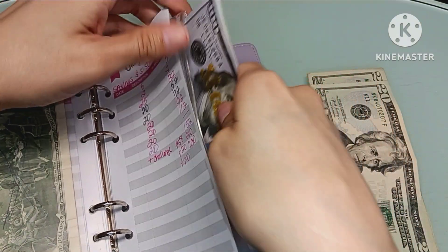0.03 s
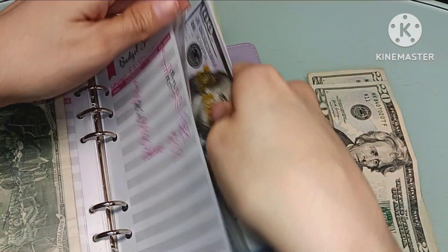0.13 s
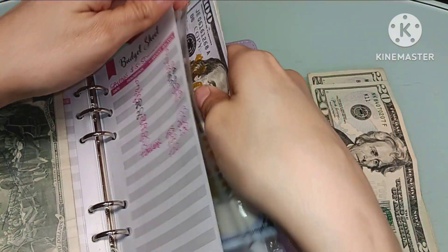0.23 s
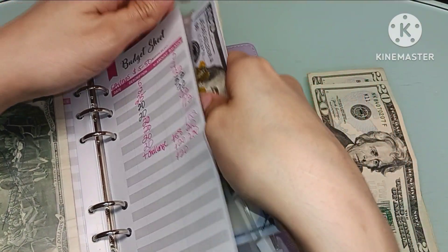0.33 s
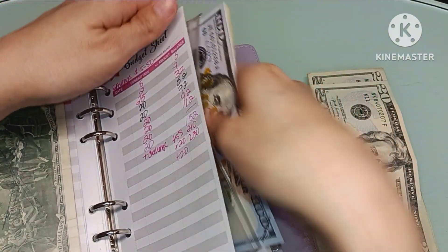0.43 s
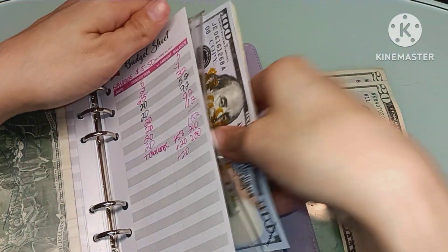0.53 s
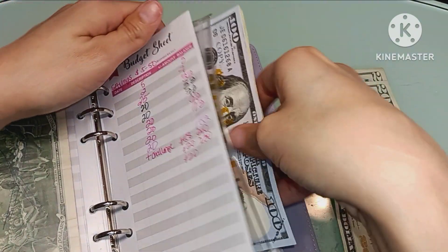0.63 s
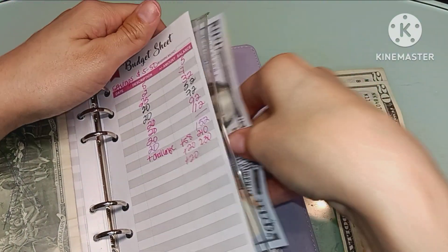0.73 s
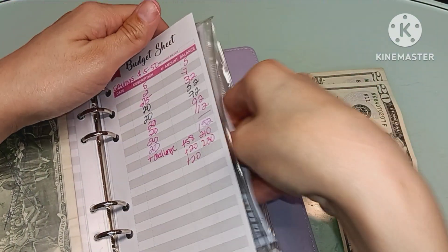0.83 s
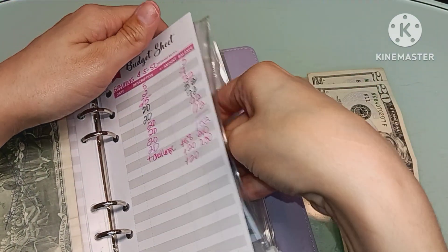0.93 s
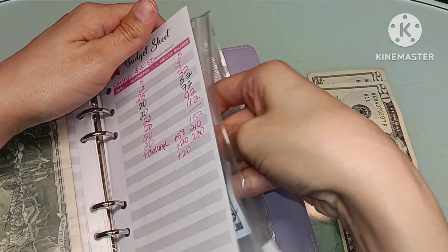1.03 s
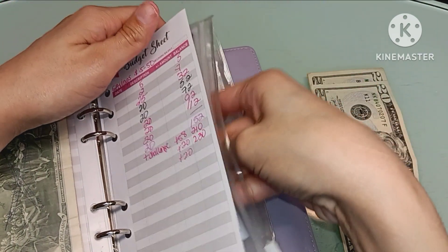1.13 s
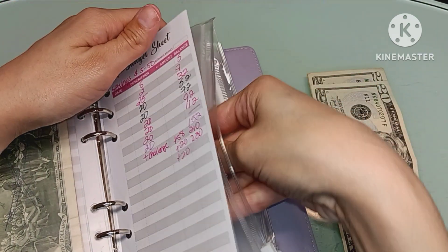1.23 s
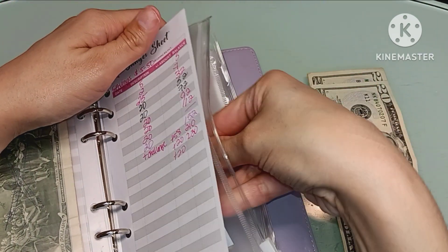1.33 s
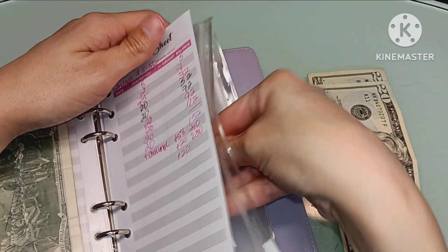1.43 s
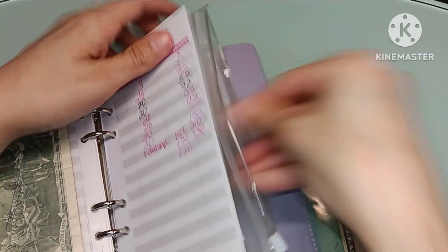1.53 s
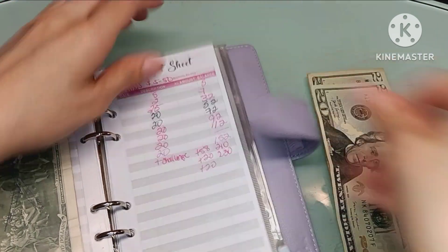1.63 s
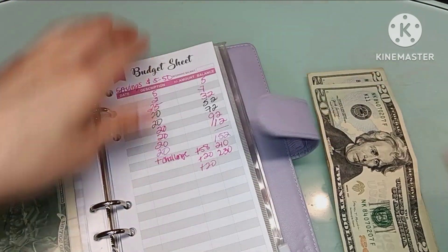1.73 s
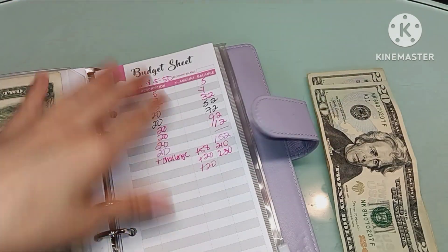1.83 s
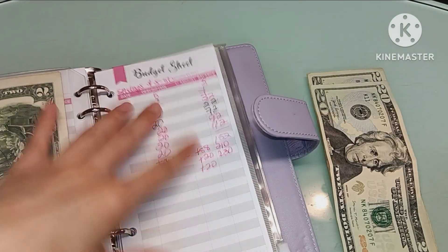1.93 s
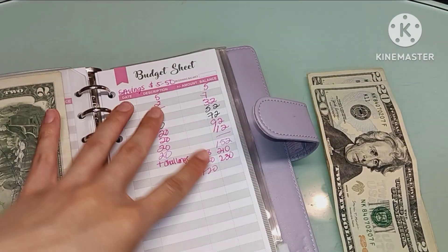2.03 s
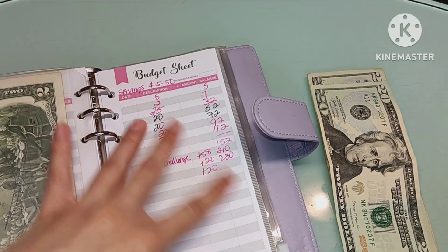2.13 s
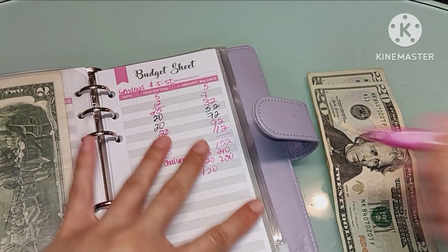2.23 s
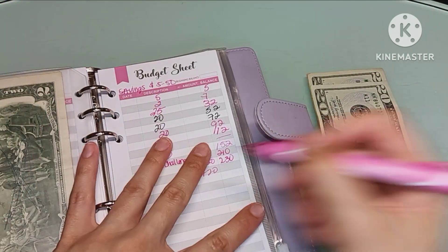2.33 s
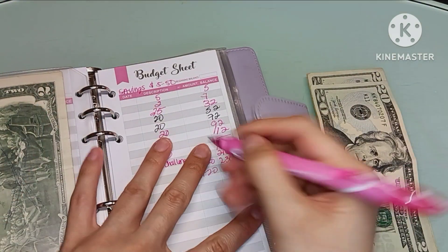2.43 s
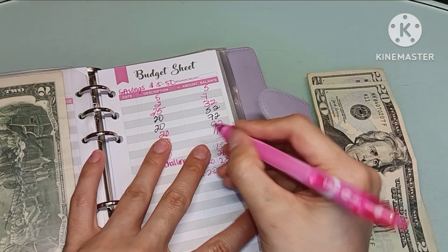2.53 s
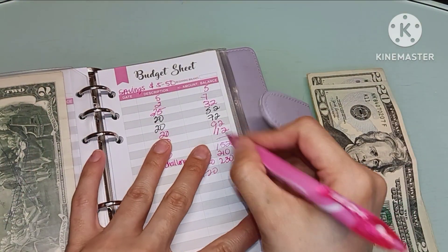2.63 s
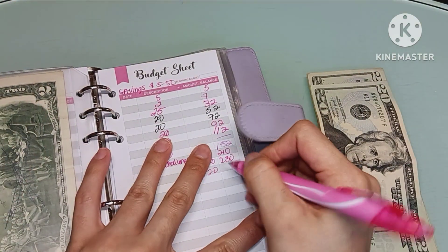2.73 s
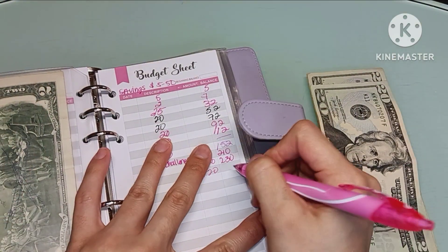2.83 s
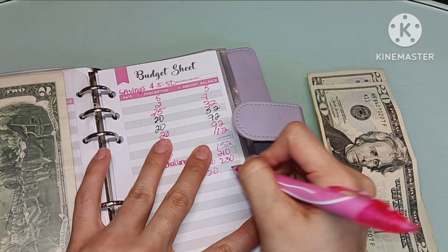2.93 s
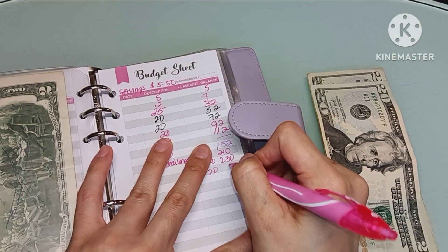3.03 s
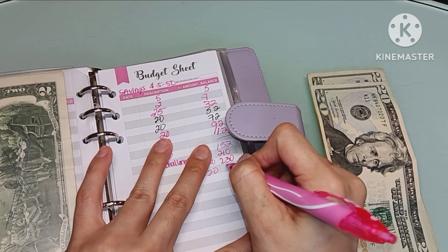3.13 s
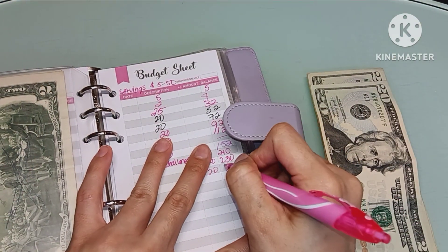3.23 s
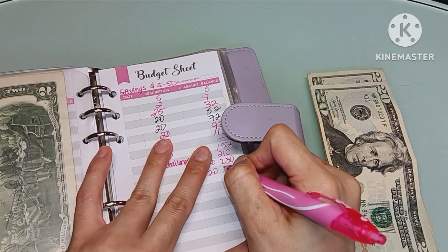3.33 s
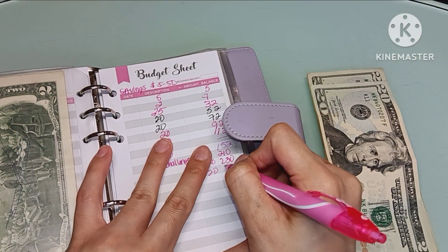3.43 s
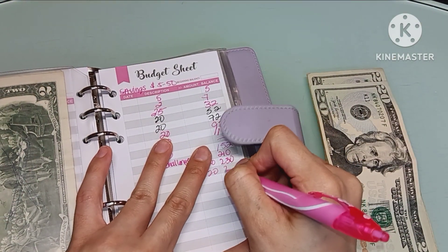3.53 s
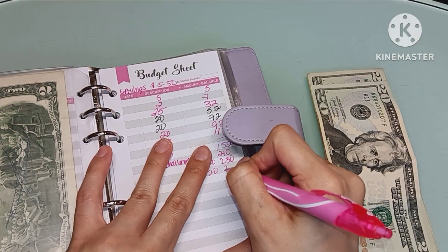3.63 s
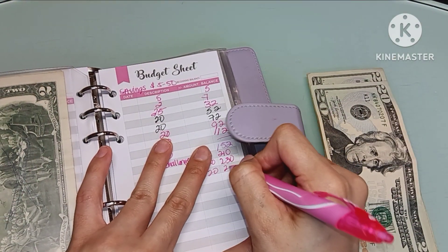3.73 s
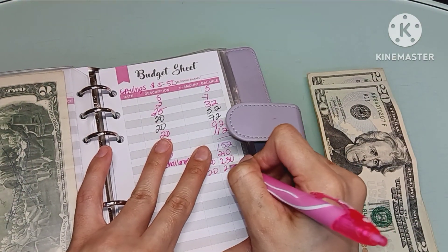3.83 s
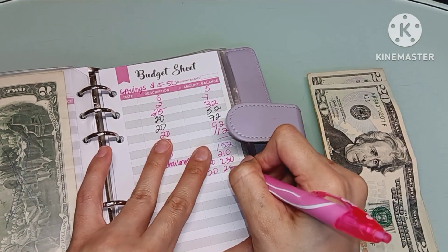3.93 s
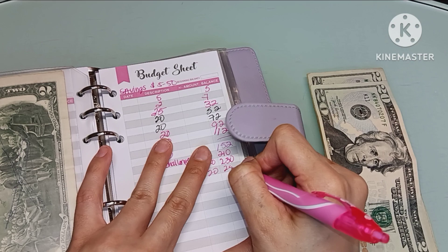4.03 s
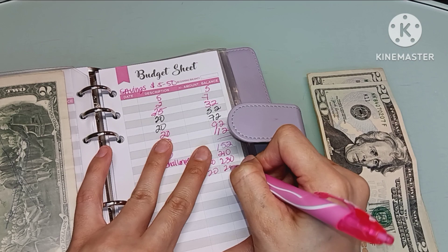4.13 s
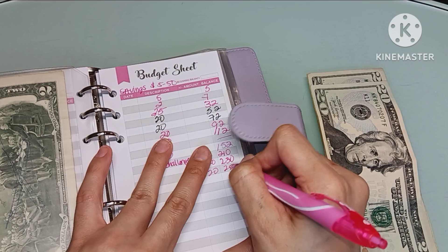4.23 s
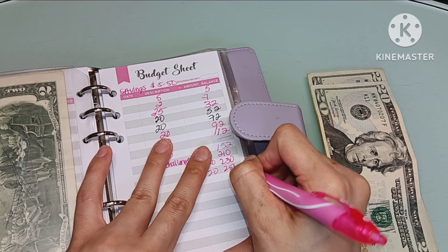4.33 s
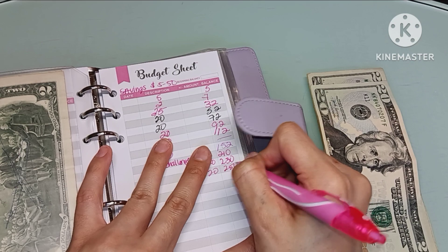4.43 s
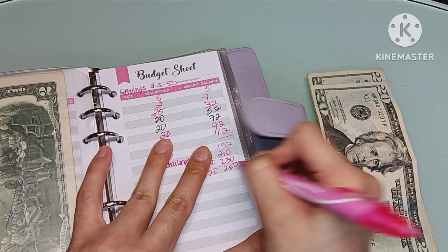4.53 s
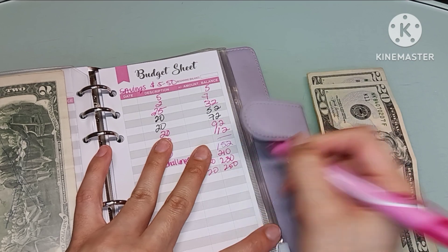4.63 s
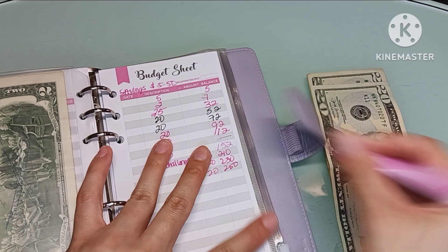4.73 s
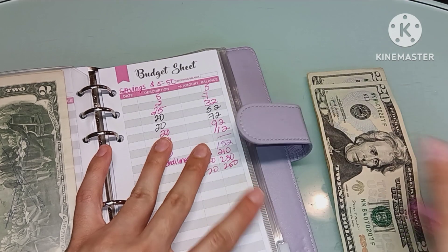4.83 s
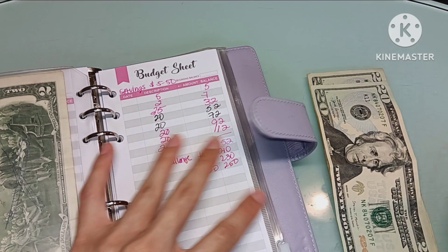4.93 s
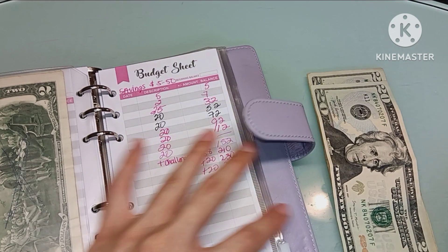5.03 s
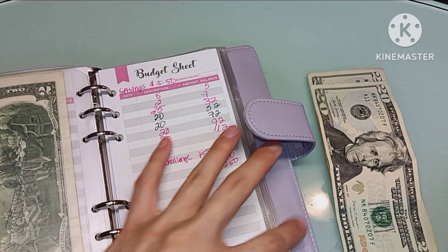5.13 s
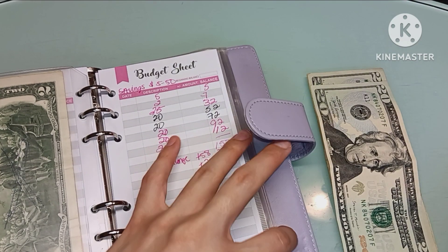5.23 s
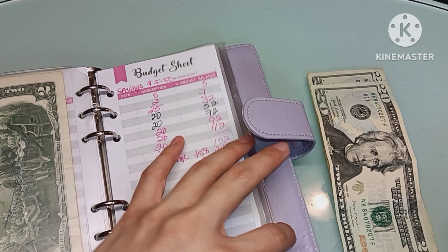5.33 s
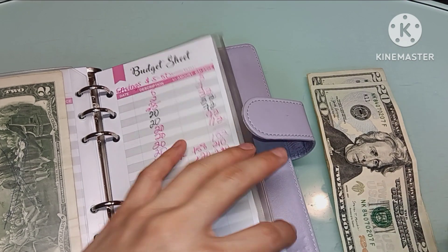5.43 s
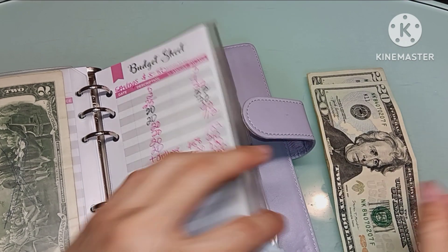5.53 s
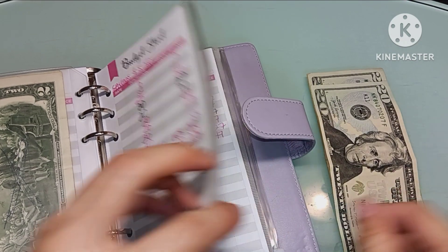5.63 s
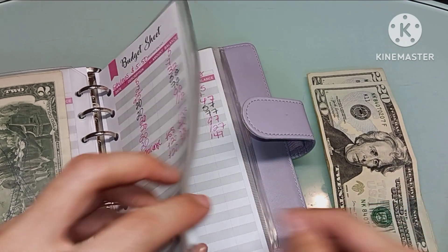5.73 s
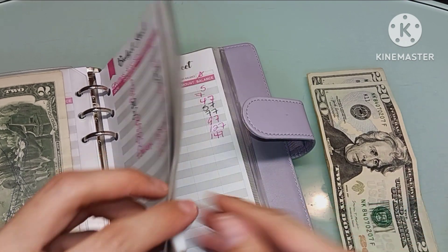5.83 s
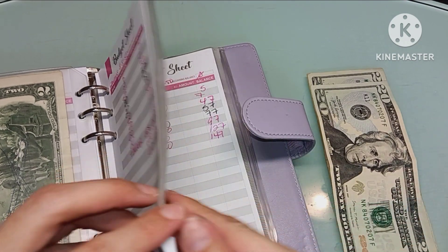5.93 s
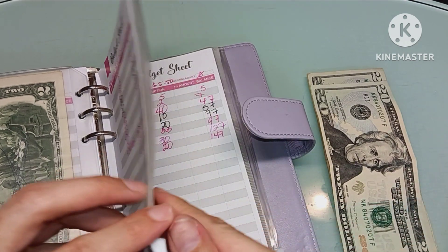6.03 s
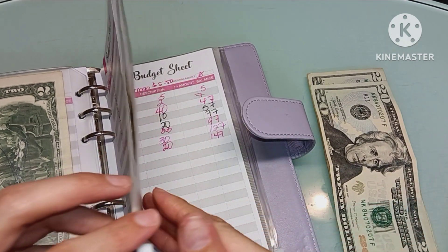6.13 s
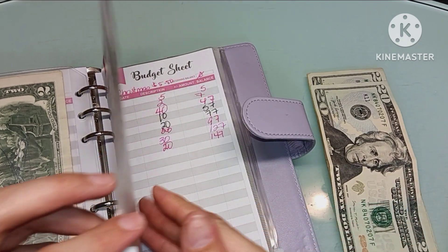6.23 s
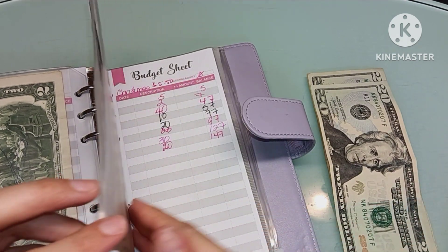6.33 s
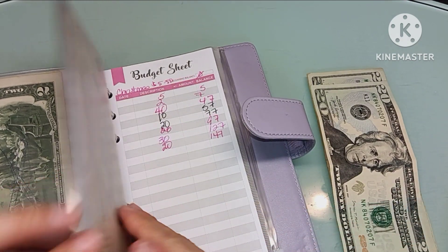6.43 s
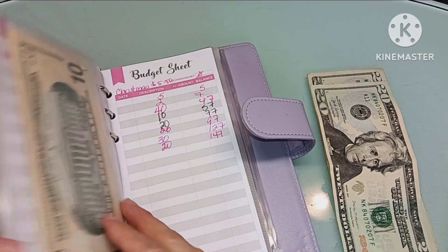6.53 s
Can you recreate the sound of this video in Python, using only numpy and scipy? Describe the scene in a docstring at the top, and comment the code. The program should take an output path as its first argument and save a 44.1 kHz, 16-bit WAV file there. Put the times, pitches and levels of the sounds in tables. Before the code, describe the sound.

Crisp paper money crinkles, followed by soft pen scratches, a click, a pen clattering onto a table and a rustling page turn.

```python
"""Banknotes rustle into a plastic pocket of a ring binder on a glass table; the page falls, a pen writes,
is clicked and dropped, and the next page is turned. Stick-slip friction drives the sheets; sudden
releases and impacts set creases, rings, pen and table vibrating in damped modes. A quiet room rumbles,
and two thin electrical whines stand in the treble. All is heard at the two ports of a nearby phone,
the right one bright, the left one dull and later."""
import sys
import numpy as np
from scipy import signal
from scipy.fft import rfft, irfft, next_fast_len
from scipy.io import wavfile
from scipy.ndimage import uniform_filter1d, map_coordinates

SR = 44100
rng = np.random.default_rng(int(sys.argv[2]) if len(sys.argv) > 2 else 0)


def to_wav(s):
    """Save 16-bit WAV."""
    ch = np.atleast_2d(s).T  # columns
    pcm = np.round(np.clip(ch, -1, 1) * 32767)  # PCM
    wavfile.write(sys.argv[1], SR, pcm.astype(np.int16))


N = 290795

# Strokes of sheet, hand or pen. Each row: start and length in seconds, base growth in dB, base decay in
# dB per second, levels of hiss, scrape, bending and flap in dB, left-right bias in dB.
STROKES = [(0, 0.027, -1.5, 300, -54, -54, -45.5, -62.5, 3),
           (0.041, 0.089, -1, 213, -48, -46, -42.5, -57.5, 2.5),
           (0.288, 0.062, 1.5, 250, -53.5, -51.5, -49.5, -73, -0.5),
           (0.366, 0.15, -8, 282, -48.5, -49.5, -51, -64, -11.5),
           (0.615, .18, 9, 450, -51.5, -52.5, -49.5, -71, -10.5),
           (0.871, 0.096, 5, 304, -59.5, -65, -55.5, -66.5, -7.5),
           (1.043, .03, 6.5, 200, -63, -60, -58, -90, -10),
           (1.1, 0.063, -0.5, 352, -48, -47.5, -48.5, -61.5, -7),
           (1.193, 0.071, -4, 600, -56.5, -62.5, -57.5, -64.5, -6),
           (1.374, 0.0063, -2, 250, -55, -67, -61.5, -82, 4),
           (1.438, 0.041, 1.5, 492, -50, -44.5, -43, -47.5, -3),
           (1.583, 0.011, -9, 702.5, -57, -52.5, -59, -54.5, 2),
           (1.809, 0.058, -1, 300, -90, -92, -74.5, -63, 1),
           (1.888, 0.0087, 1.5, 450, -57, -64.5, -66, -79.5, 0),
           (1.95, 0.11, 3.5, 300, -61.5, -75, -81, -84, -6),
           (2.054, 0.024, -0.5, 800, -53.5, -66, -74, -70.5, -2),
           (2.104, 0.09, -1, 250, -64.5, -73.5, -83, -83, 2), (2.49, .006, 1, 300, -65, -78, -80, -76, 0),
           (2.556, 0.41, 1.5, 150, -83.5, -90, -85.5, -85, 0),
           (3.133, 0.093, 9, 250, -90, -98, -89, -82, 11), (3.393, 0.061, 8, 500, -80, -83.5, -79, -84, 2),
           (3.72, 0.27, -3, 300, -91, -87.5, -87, -87, 2), (4.17, 0.011, -3, 500, -75.5, -80, -83, -77, -4),
           (4.24, 0.14, 2, 400, -78.5, -85, -81, -81.5, 2), (4.442, 0.033, 1, 220, -63, -75, -77, -84, -11),
           (4.57, 0.12, -10.5, 151, -60, -69.5, -76, -70, -1),
           (4.758, 0.14, 20, 249.5, -82.5, -82.5, -81.5, -77.5, -3),
           (5.196, 0.047, -2.5, 250, -67, -76.5, -80.5, -79.5, 3),
           (5.447, 0.085, -2, 150, -49.5, -63, -71.5, -79.5, 3.5),
           (5.513, 0.084, -1, 250, -63.5, -56, -69, -80, 11),
           (5.607, 0.062, 3, 243, -42.5, -42.5, -47.5, -66, 3),
           (5.76, 0.091, 2.5, 350, -69, -60, -61.5, -71.5, 7),
           (5.937, 0.057, -8.5, 198, -88, -75, -61.5, -66, -1),
           (6.094, 0.14, 16, 249, -78.5, -76, -78, -79, -10),
           (6.244, 0.091, -5.5, 400.5, -57.5, -61.5, -72, -79, -7),
           (6.46, .012, 0.5, 500, -77, -69, -69.5, -71, 2.5),
           (6.547, .04, 3.5, 250, -79, -74.5, -80, -84.5, 5)]
# Spectra of those four parts of a sheet's sound. Each row: frequency in Hz, relative level in dB.
HISS = [(4410, -32.5), (7500, -11), (8210, -4.5), (9770, 7), (11600, -7.5), (12600, -13.5), (13400, -14.5),
        (14800, -14), (15400, -23)]
SCRAPE = [(1880, -42), (3200, -5.5), (3590, -9), (4840, 2.5), (5430, 1.5), (6650, -4), (8600, -9.5),
          (11200, -26.5), (18900, -120)]
BENDING = [(410, -37), (700, -15), (795, -2), (1240, -2.5), (1490, 1), (1700, -6.5), (2050, 1), (3490, -8),
           (3800, -8), (4940, -15.5), (8360, -120)]
FLAP = [(76, -32), (130, -10.5), (278, -0.5), (325, 5.5), (427, -5), (753, -3), (900, -14.5), (1170, -25.5),
        (1980, -120)]
# One entry for each part, in the same order.
RISE_DB_PER_S = [420, 464, 370, 484]
GROWTH_FACTORS = [1.2, 1.07, 0.43, 0.27]
DECAY_FACTORS = [1.45, 1.19, 0.84, .9]
PORT_BIAS_DB = [-24, -4, 2, 9]  # left minus right
# Reverberation of the room. Each row: frequency in Hz, time to decay by 60 dB (t60) in seconds.
ROOM_T60 = [(200, 0.13), (1000, 0.19), (3000, 0.2), (8000, 0.17), (15000, 0.14)]
# Spectra of the background noise. Each row: frequency in Hz, relative level in dB.
AIR = [(53, -28), (90, -3.5), (242, -6.5), (461, -12.5), (709, -15), (1510, -18), (1790, -20), (1910, -20),
       (6640, -28.5), (8060, -29), (8790, -23.5), (10000, -28.5), (15400, -33.5)]
RUMBLE = [(12, -43), (20, -10.5), (70, 5), (83, 0.5), (97, -10), (125, -3.5), (150, -16.5), (200, -38.5),
          (330, -120)]
# Likeness of that noise at the two ports. Each row: frequency in Hz, shared fraction of the power.
SHARED_POWER = [(30, 0.31), (70, 0.62), (200, 0.2), (500, 0.25), (2000, 0.086)]
# Hands lean on the table and the rumble swells. Each row: centre and half width in seconds, level in dB.
SWELLS = [(.5, 0.097, -60), (1.13, 0.088, -74), (2.12, 0.041, -76), (3.78, 0.028, -71), (4.32, 0.043, -73),
          (5.01, 0.09, -67.5), (5.5, 0.12, -63), (5.791, 0.063, -66.5), (6.05, .04, -57)]
# Balance of the background and of near sounds. Each row: frequency in Hz, left minus right in dB.
BACKGROUND_BALANCE = [(100, 6), (1000, 5), (2700, 3), (6000, -2.5), (8500, -10), (9500, -22), (15000, -5)]
NEAR_BALANCE = [(60, 5.5), (140, 6.5), (330, 12.5), (500, 12), (770, 8), (1170, 6), (1790, 3), (4180, -1.5),
                (6390, -5), (8000, -6), (9000, -21), (10000, -27), (11500, -30.5), (14900, -32.5)]
# Contours of the two whines. Each row: time in seconds, level in dB.
LOWER_WHINE = [(0, -84), (1.7, -73), (2.2, -77.5), (2.5, -71.5), (3.3, -74), (4.3, -80.5), (4.6, -76),
               (5.3, -69.5), (6, -80), (6.59, -78)]
UPPER_WHINE = [(0, -92), (1.7, -78.5), (2.5, -88), (3.4, -82), (3.7, -89), (4.2, -93), (4.6, -72.5),
               (5.3, -84), (6, -74.5), (6.3, -86.5)]
# Snaps of creases, rings and pen. Each row: start in seconds, level in dB, note in Hz, its relative
# level in dB, thump in Hz, its relative level in dB, left-right bias in dB.
SNAPS = [(0.0326, -30, 1660, 0, 790, -17, -0.5), (0.0586, -33, 920, 2, 157, -5.5, 7),
         (0.216, -61.5, 2820, 20, 314, -2, 10), (0.3125, -38, 1890, 1.5, 319, -6, 14),
         (.3407, -34, 2940, -6, 805, -17, 12), (0.4778, -33.5, 2040, -16, 145, -35, -11.5),
         (.8934, -40, 2000, -7.5, 800, -12.5, -8.5), (.9004, -41, 2000, 7, 787, -0.5, -2),
         (.9134, -47.5, 1970, 9, 760, -8, 3), (.9435, -34.5, 1070, -2, 784, -24, -7),
         (0.955, -39, 2990, -3, 361, -13, -3), (1.001, -43, 4650, -10, 151, -29, -7),
         (1.0238, -40.5, 2090, -3, 145, -38, -10), (1.3624, -34, 3960, -20, 258, -37, 6),
         (1.4274, -42.5, 3140, 7.5, 715, 0.5, 9), (1.464, -31.5, 1120, -4, 268, -7, -11),
         (1.474, -22.5, 1063, -1.5, 338, -8.5, -3), (1.5653, -20.5, 1860, -7.5, 710, -31, -4),
         (1.5767, -29.5, 1620, -6.5, 230, -17, 6), (1.8055, -56.5, 2250, -6, 335, 1.5, 14.5),
         (1.829, -62, 2300, -11, 327, 6, 8), (1.849, -58, 910, -3, 350, 6.5, 9.5),
         (1.859, -47.5, 950, -12, 234, -10.5, 9.5), (1.878, -34, 4600, -17.5, 460, -34, -4),
         (1.8844, -33, 1860, -20, 363, -43, 1), (3.1906, -37.5, 1750, -28, 183, -34, -11),
         (3.6484, -68.5, 1980, 7, 145, -12, 8), (3.7194, -63.5, 1800, -5.5, 627, -13, 8),
         (4.4181, -34.5, 5550, -40, 145, -50, -11), (4.4294, -42, 5400, -27, 277, -38, -1),
         (4.4648, -50.5, 4710, -9, 754, -23, -9), (4.564, -37, 1820, -10, 577, -5, -3),
         (4.857, -44, 5440, -14.5, 307, -21, -3.5), (5.2492, -60, 1185, -11.5, 152.8, -15, 5),
         (5.3686, -62.5, 3620, 3.5, 172, -14, 1.5), (5.606, -24.5, 970, -9, 721, -50, -7),
         (5.735, -28.5, 1320, -12, 479, -34.5, 3), (5.752, -34.5, 1300, -19, 501, -31, 8),
         (5.921, -57, 2970, 9, 350, -20, -3), (6.0592, -33.5, 1400, -15.5, 144, -37, -3),
         (6.1933, -47.5, 2990, -3, 285, -21, -3), (6.2878, -41, 5020, -26, 144, -24.5, -4.5),
         (6.4726, -45, 1205, -10.5, 313, -32, -2)]
# Spectrum of a snap's tick. Each row: frequency in Hz, relative level in dB.
TICK = [(2650, -48), (4500, -14.5), (5730, -15), (6450, -5), (7840, -12.5), (8640, 0.5), (9880, 2),
        (15400, -21)]
# Short rubs that sing. Each row: start and length in seconds, resonance in Hz, level in dB.
RUBS = [(.53, 0.066, 2090, -54.5), (.86, 0.037, 4900, -62.5), (1.35, 0.069, 4000, -60.5),
        (3.86, 0.047, 3600, -81), (4.155, 0.047, 3540, -78), (4.29, .04, 3560, -76.5),
        (4.33, 0.058, 1900, -73.5), (4.37, 0.026, 4300, -75.5), (4.46, 0.032, 4940, -75),
        (4.47, .04, 6100, -82), (5.62, 0.045, 4870, -41.5), (5.73, 0.072, 1450, -57)]
# The pen lands, bounces, settles and is nudged. Each row: start in seconds, level in dB, crack t60 in
# seconds, relative barrel level in dB, knock in Hz, relative levels of knock and table in dB.
PEN_IMPACTS = [(4.9031, -1, .02, -14, 1005, -26.5, -31), (4.931, -9, 0.018, -9, 3040, -11, -27.5),
               (4.955, -22, 0.023, -3, 1524, -8, -15.5), (5.0064, -34, 0.039, -6.5, 1484, 4, -12),
               (5.0407, -43, 0.023, 5.5, 966, 9.5, -4), (5.088, -52.5, 0.018, 1, 1040, 7.5, 0),
               (5.1074, -16, 0.039, -26, 780, -12, -11), (5.53, -60, .02, -6, 983, 13.5, -10.5),
               (5.9188, -50.5, 0.011, 2.5, 1490, 5, -13.5), (5.97, -63, 0.018, -10, 345, 11, 8),
               (6.1, -63, 0.011, 7, 1480, 16.5, -6)]
# Spectrum of an impact's crack. Each row: frequency in Hz, relative level in dB.
CRACK = [(350, -35.5), (600, -15), (1030, -15), (1830, -14.5), (2600, -11.5), (3850, -11), (4470, -8),
         (7690, -4.5), (8580, -6.5), (10100, 3.5), (15400, -22)]
# Modes of pen barrel and glass table. Each row: frequency in Hz, relative level in dB, t60 in seconds.
BARREL_MODES = [(2036, -9, 0.1), (2615, -4.5, 0.082), (3050, -10, .1), (4540, -8.5, 0.041),
                (4930, -8, 0.082), (5997, -5.5, 0.11), (7000, -9, 0.07), (7520, -2, 0.065),
                (8640, -13.5, 0.065), (10600, -10, 0.078), (10177, -15.5, 0.1), (10200, -10, 0.092)]
TABLE_MODES = [(244, -10.5, 0.12), (343.5, 0.5, 0.11), (388.6, -4.5, 0.076), (593, -10.5, 0.1),
               (690, -6.5, 0.065)]


def amp(db):
    """Amplitude ratio of a level in dB."""
    return 10 ** (np.asarray(db) / 20)


def unit(x):
    """Normalisation to an rms of 1."""
    return x / np.sqrt(np.mean(x ** 2) + 1e-20)


def along(points, hz):
    """Interpolation of (Hz, value) points on a logarithmic frequency axis."""
    freqs, values = np.transpose(points)
    return np.interp(np.log(hz + 1), np.log(freqs + 1), values)


def wobble(rate):
    """Smooth random modulation: a spline through rate knots a second."""
    knots = rng.standard_normal(int(N * rate / SR) + 4)
    return map_coordinates(knots, [np.arange(N) * rate / SR])


def filtered(x, gain):
    """Minimum-phase filtering: folding the cepstrum makes the response gain(hz) causal."""
    m = 2 * next_fast_len(x.shape[-1] // 2 + 4096)
    cepstrum = irfft(np.log(np.maximum(gain(np.fft.rfftfreq(m, 1 / SR)), 1e-6)), m)
    cepstrum[..., 1:m // 2] *= 2
    cepstrum[..., m // 2 + 1:] = 0
    return irfft(rfft(x, m) * np.exp(rfft(cepstrum)), m)[..., :x.shape[-1]]


def coloured(x, spectrum):
    """Causal filtering by a spectrum of (Hz, dB) points."""
    return filtered(x, lambda hz: amp(along(spectrum, hz)))


def shaped(noise, gain):
    """Zero-phase filtering of steady noise by gain(hz)."""
    m = next_fast_len(N)
    return irfft(rfft(noise, m) * gain(np.fft.rfftfreq(m, 1 / SR)), m)[..., :N]


def sides(db):
    """Constant-power panning: two gains for a left-right level difference."""
    ratio = amp(db) ** 2
    return 2 * np.sqrt(np.array([ratio, np.ones_like(ratio)]) / (1 + ratio))


def pair(source, shared):
    """Partial coherence: two signals share a fraction of their power."""
    common, left, right = source(), source(), source()
    return np.sqrt(shared) * common + np.sqrt(1 - shared) * np.array([left, right])


def ring(modes, t, scatter_db):
    """Free vibration: a sum of damped modes, at new strengths for each blow."""
    return sum(amp(db + rng.normal(0, scatter_db) - 60 * t / t60) * np.sin(2 * np.pi * hz * t)
               for hz, db, t60 in modes)


def burst(t, t60, spectrum, shared):
    """A transient: exponentially decaying noise at both ports, with a peak of 1."""
    noise = pair(lambda: rng.standard_normal(len(t)), shared)
    x = coloured(amp(-60 * t / t60) * noise, spectrum)
    return x / np.abs(x).max()


def stroke_envelopes():
    """Incoherent strokes add in power, giving each part's gain and the hand's left-right bias."""
    t = np.arange(0, N / SR + .002, .001)
    start, length, growth_db, decay, *levels_db, pan_db = np.transpose(STROKES)[..., None]
    before, after = np.maximum(start - t, 0), np.maximum(t - start - length, 0)
    progress = np.clip((t - start) / length, 0, 1)
    powers = [amp(db + grow * growth_db * progress - rise * before - fall * decay * after) ** 2
              for db, grow, rise, fall in zip(levels_db, GROWTH_FACTORS, RISE_DB_PER_S, DECAY_FACTORS)]
    hand_db = (pan_db * sum(powers)).sum(0) / sum(powers).sum(0)
    per_sample = lambda curve: np.interp(np.arange(N) / SR, t, curve)
    return [per_sample(np.sqrt(power.sum(0))) for power in powers], per_sample(hand_db)


def sheets():
    """Stick-slip friction: fibres catch and slip in clumps, driving every part of the sheet at once."""
    gains, hand_db = stroke_envelopes()
    clumps = amp(0.99 * wobble(40) + 1.8 * wobble(300))
    catches = amp(rng.uniform(-5.5, 11, N)) * (rng.random(N) < .04)
    slips = pair(lambda: (1 + 0.49 * catches) * rng.standard_normal(N), shared=0.18) * clumps
    # The bent sheet favours changing notes: random patches in frequency and time.
    spectra = signal.stft(slips, SR, nperseg=512)[2]
    patches = uniform_filter1d(rng.standard_normal(spectra.shape[1:]), size=3, axis=0)
    patches = uniform_filter1d(patches, size=9, axis=1)
    slips = signal.istft(spectra * amp(3.72 * unit(patches)), SR, nperseg=512)[1][:, :N]
    # The hand moves between the ports, shifting each part about the ports' own bias.
    place = lambda bias: sides(bias + 0.86 * hand_db) / sides(bias)[:, None]
    parts = zip(gains, (HISS, SCRAPE, BENDING, FLAP), PORT_BIAS_DB)
    return sum(gain * unit(coloured(slips, spectrum)) * place(bias) for gain, spectrum, bias in parts)


def reverberation(x):
    """Wall reflections decay at a rate set by frequency; each 0.3 s of sound takes new random paths."""
    out = np.zeros((2, N + SR))
    step, delay_samples = round(.3 * SR), 130
    for start in range(0, N, step):
        hz, t, spectra = signal.stft(rng.standard_normal((2, SR // 3)), SR, nperseg=256)
        decay = amp(-60 * t / along(ROOM_T60, hz)[:, None])
        tail = signal.istft(spectra * decay, SR, nperseg=256)[1]
        wet = signal.fftconvolve(x[:, start:start + step], tail / np.linalg.norm(tail[0]), axes=1)
        out[:, start + delay_samples:][:, :wet.shape[1]] += wet
    return out[:, :N]


def diffuse_noise(spectrum):
    """A diffuse field: noise that is most alike at the two ports in the bass."""
    def gains(hz):
        shared = np.clip(along(SHARED_POWER, hz), .01, .99)
        return amp(along(spectrum, hz)) * np.sqrt([shared, 1 - shared, 1 - shared])
    common, left, right = shaped(rng.standard_normal((3, N)), gains)
    return unit(common + np.array([left, right]))


def background():
    """Ambient noise: room air, and a rumble that swells as hands lean on the table."""
    t = np.arange(N) / SR
    air = diffuse_noise(AIR) * amp(-74 + 0.36 * wobble(11))
    swells = sum(amp(db) * np.exp(-((t - centre) / width) ** 2) for centre, width, db in SWELLS)
    rumble = diffuse_noise(RUMBLE) * (amp(-72 + 1.2 * wobble(5)) + swells) * amp(0.71 * wobble(8))
    return shaped(air + 0.66 * rumble, lambda hz: sides(along(BACKGROUND_BALANCE, hz)))


def whine(contour, hz, drift_hz, waver_db, pan_db):
    """An electrical tone under slow random modulation of frequency and amplitude."""
    phase = 2 * np.pi * np.cumsum(hz + drift_hz * wobble(5.5)) / SR
    level_db = np.interp(np.arange(N) / SR, *np.transpose(contour)) + waver_db * wobble(12)
    return np.sqrt(2) * amp(level_db) * np.sin(phase) * sides(pan_db)[:, None]


def snaps(note_t60=0.015):
    """Sudden release: a tick, a blurred note of the part that gave way and a thump of the binder."""
    out, t = np.zeros((2, N + SR)), np.arange(SR // 10) / SR
    for start, db, hz, note_db, thump_hz, thump_db, pan_db in SNAPS:
        band = [(0.34 * hz, -25), (hz, 0), (3.2 * hz, -11), (5 * hz, -28)]
        blur = burst(t, note_t60, band, shared=0.25)
        tone = ring([(hz, 0, 1.9 * note_t60)], t, scatter_db=1)
        note = amp(note_db) * (1.08 * blur + .5 * tone)
        binder = ring([(thump_hz, 0, .05), (1.9 * thump_hz, -14, .025)], t, scatter_db=1)
        thump = amp(thump_db + 0.5) * (1 - np.exp(-t * thump_hz * 3.4)) * binder
        tick = burst(t, 0.0095, TICK, shared=0.17)
        gains = amp(db + np.outer([.45, -.45], pan_db + 2.5))
        out[:, round(start * SR):][:, :len(t)] += gains * (tick + note + thump)
    return out[:, :N]


def rubs():
    """Forced resonance: friction noise sings in one narrow band, swelling and fading."""
    out = np.zeros((2, N + SR))
    for start, length, hz, db in RUBS:
        n = round(length * SR)
        friction = pair(lambda: rng.standard_normal(n), shared=0.41)
        resonance = [(0.72 * hz, -30), (.93 * hz, -5), (hz, 0), (1.07 * hz, -5), (1.4 * hz, -30)]
        rub = unit(coloured(friction, resonance)) * np.sqrt(np.hanning(n))
        out[:, round(start * SR):][:, :n] += amp(db) * rub
    return out[:, :N]


def pen_drop():
    """Impact excites modes: after a crack the barrel rattles, its air knocks and the table rings."""
    out, t = np.zeros((2, N + SR)), np.arange(SR // 4) / SR
    rise = 1 - np.exp(-t / 0.0019)
    for start, db, crack_t60, barrel_db, knock_hz, knock_db, table_db in PEN_IMPACTS:
        # Loose parts blur the barrel's modes.
        rattle = unit(uniform_filter1d(rng.standard_normal((2, len(t))), size=200, axis=1))
        barrel = amp(barrel_db - 9) * ring(BARREL_MODES, t, scatter_db=1.5) * (.7 + 0.51 * rattle)
        cavity = ring([(knock_hz, 0, .028)], t, scatter_db=0.5)
        band = [(.4 * knock_hz, -25), (knock_hz, 0), (3.1 * knock_hz, -20)]
        knock = amp(knock_db) * (cavity + 0.63 * burst(t, .03, band, shared=0.22))
        table = amp(table_db - 4) * ring(TABLE_MODES, t, scatter_db=0.5)
        crack = burst(t, crack_t60, CRACK, shared=0.21)
        out[:, round(start * SR):][:, :len(t)] += amp(db) * (crack + rise * (barrel + knock + table))
    return out[:, :N]


def scene():
    """Superposition: direct and reflected sound, coloured by each port, over the quiet of the room."""
    paper, clicks, pen = sheets() + rubs(), snaps(), pen_drop()
    reflections = reverberation(amp(-13) * paper + amp(-9) * clicks + amp(-2.5) * pen)
    near = filtered(paper + clicks + pen + reflections, lambda hz: sides(along(NEAR_BALANCE, hz)))
    quiet = background()
    quiet += whine(LOWER_WHINE, hz=8575, drift_hz=0.94, waver_db=2.3, pan_db=-0.5)
    quiet += whine(UPPER_WHINE, hz=9515, drift_hz=12, waver_db=4.5, pan_db=-34.5)
    return near + quiet


def record(dry):
    """Delay, saturation and band limit: the left port hears later, and the loudest crack clips."""
    lag_samples, top_hz = 45, 15525
    delayed = np.array([np.pad(dry[0], (lag_samples, 0))[:N], dry[1]])
    clipped = delayed / (1 + np.abs(delayed) ** 8) ** (1 / 8)
    m = next_fast_len(N + SR // 4)
    passband = np.fft.rfftfreq(m, 1 / SR) < top_hz
    return irfft(rfft(clipped, m) * passband, m)[:, :N]


dry = scene()
out = record(dry)
to_wav(out)
```